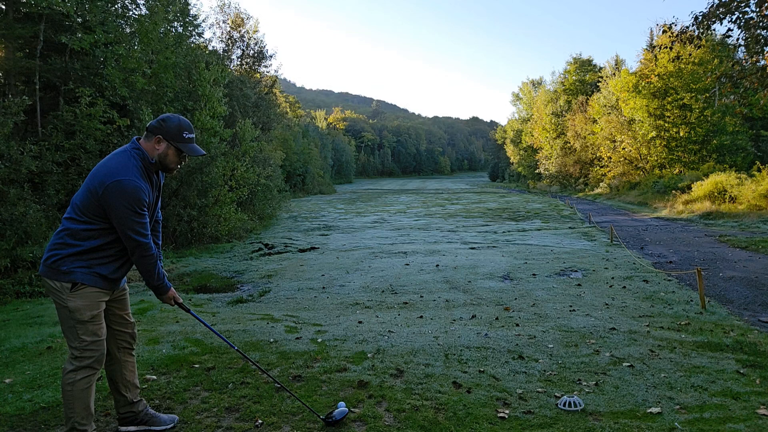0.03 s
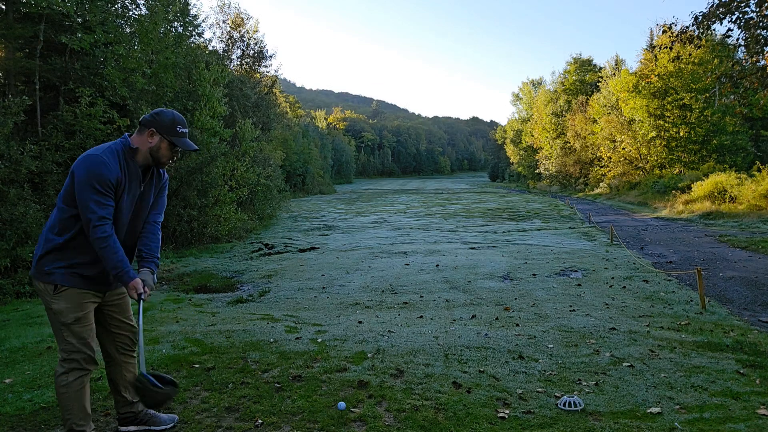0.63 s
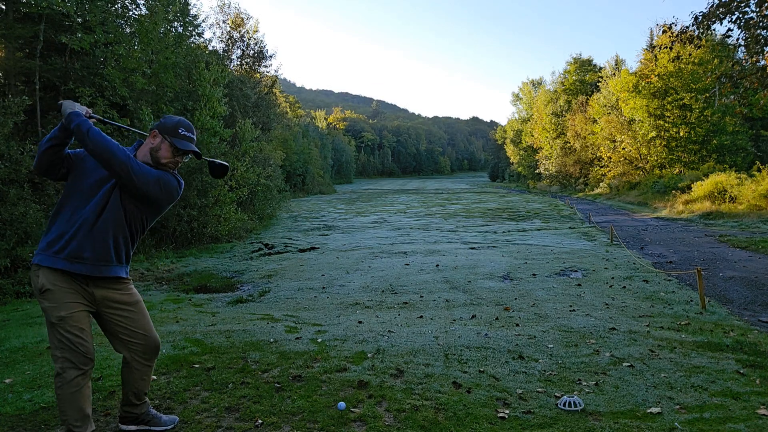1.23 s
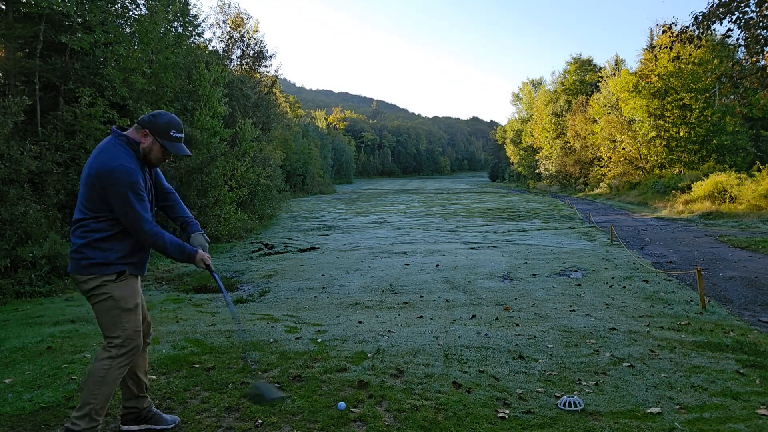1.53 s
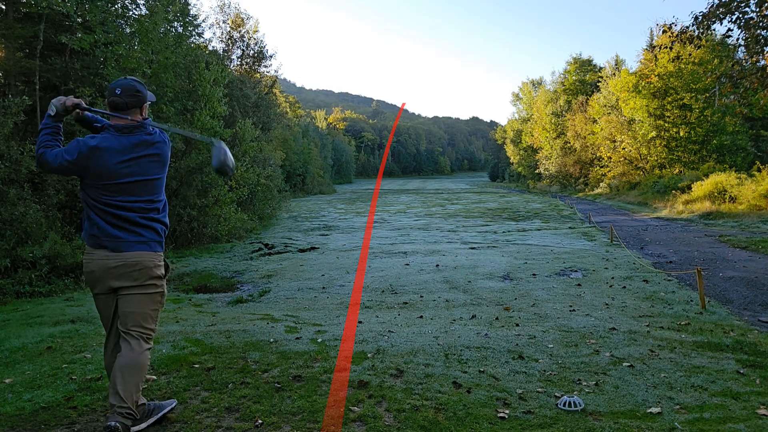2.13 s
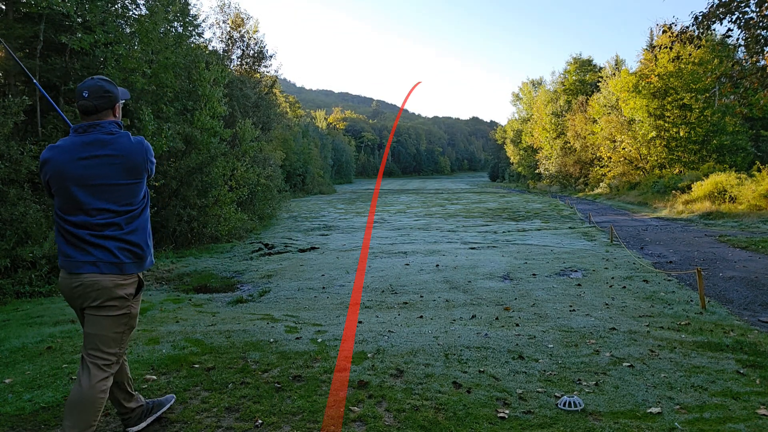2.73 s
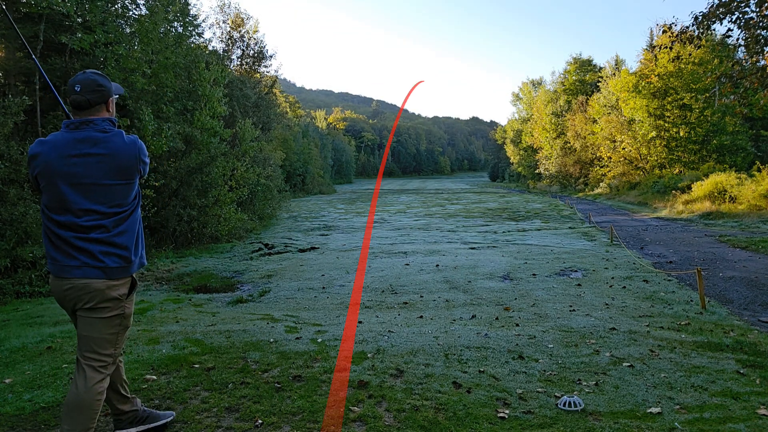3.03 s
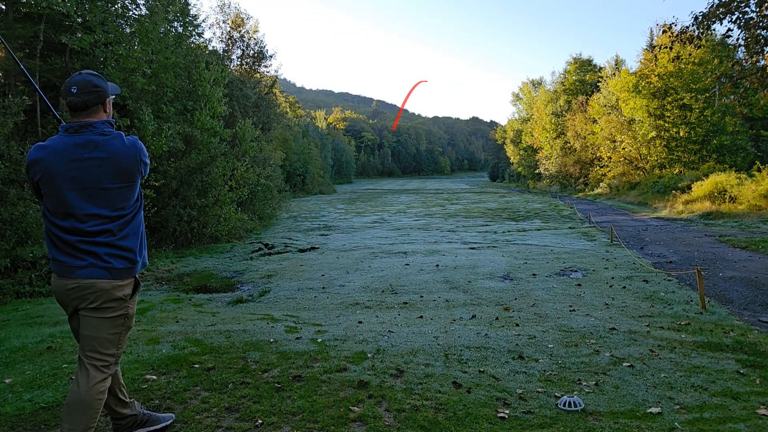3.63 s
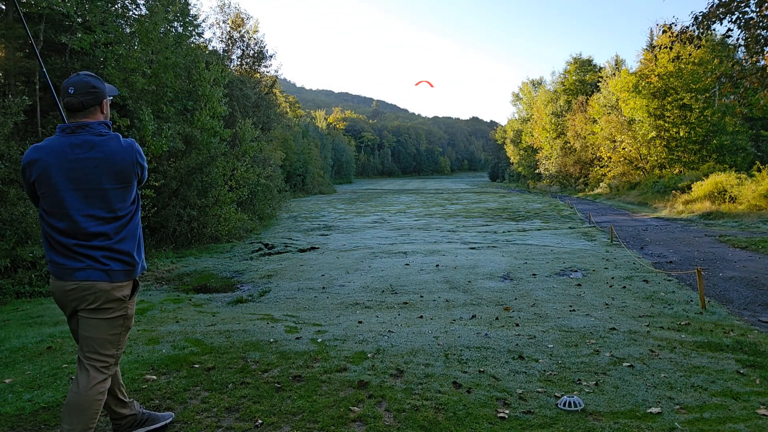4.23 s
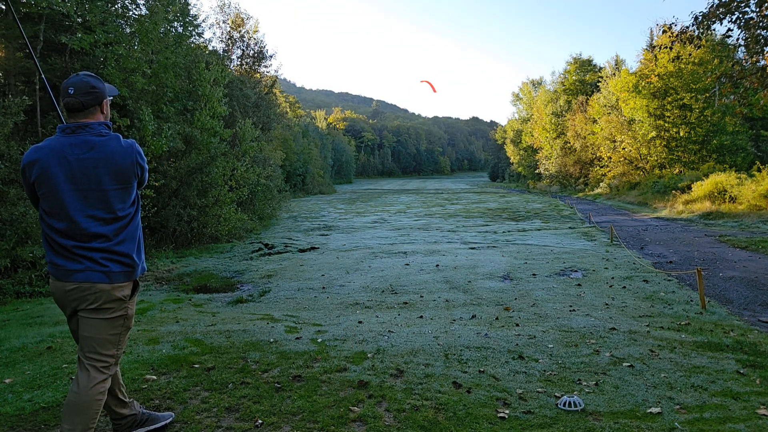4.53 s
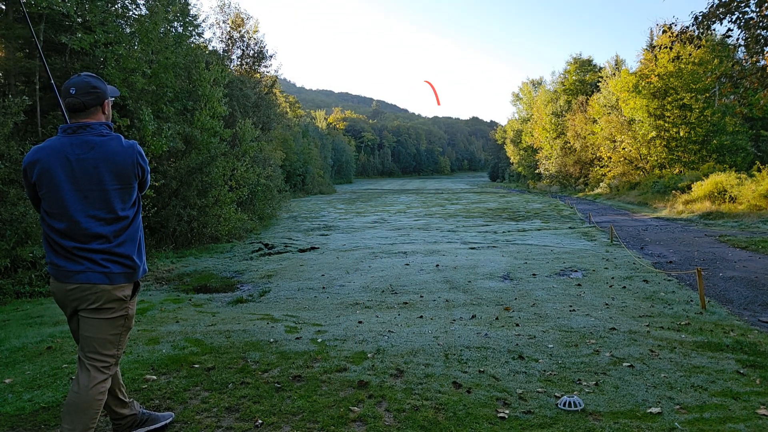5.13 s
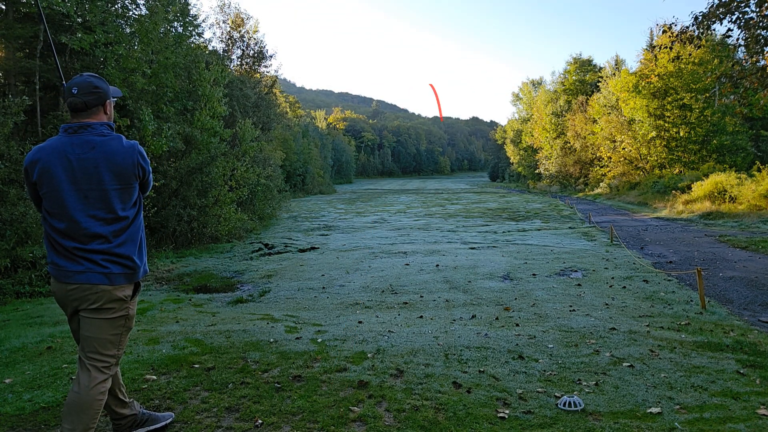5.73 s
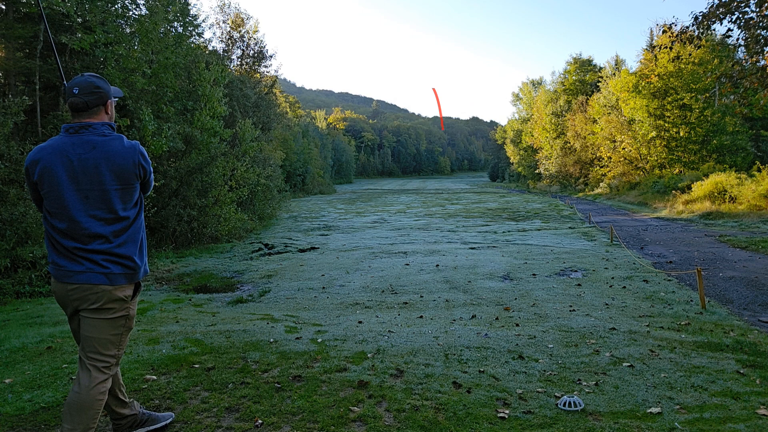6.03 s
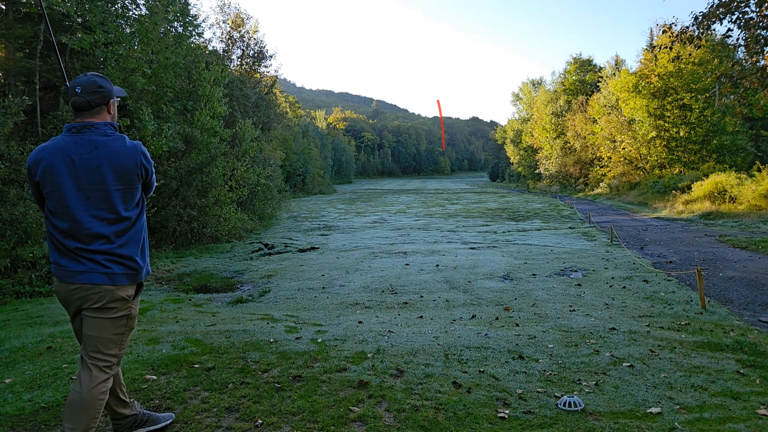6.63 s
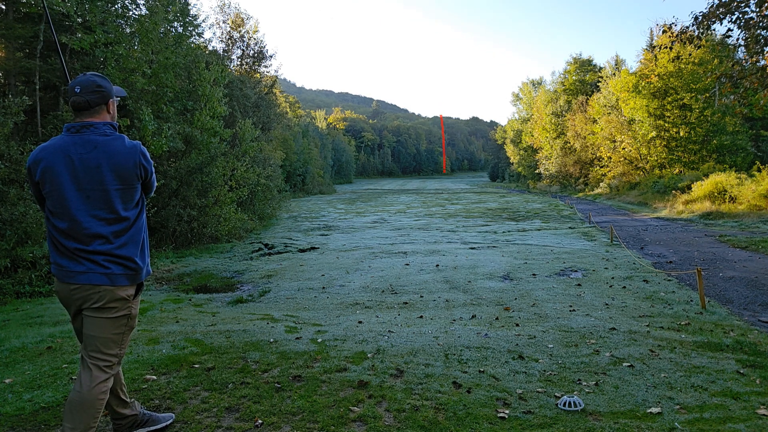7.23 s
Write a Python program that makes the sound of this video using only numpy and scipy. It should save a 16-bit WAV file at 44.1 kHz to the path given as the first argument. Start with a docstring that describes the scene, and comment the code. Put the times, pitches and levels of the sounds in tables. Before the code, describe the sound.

A quick swish and a sharp, ringing crack of a golf club hitting a ball, echoing off trees, with faint birds and low rumble.

```python
"""A golfer hits a driver off the tee in a wooded valley; stereo microphone behind the tee, still morning.
Close by, the shaft whistles as it sheds vortices, the ball cracks off the face, and the hollow metal head
rings as it flies on. Near trunks and the trees down the fairway throw it all back.
His jacket rustles, his shoes scuff and his front foot thuds. Small birds call from the trees;
far off, a larger bird calls and an engine drones under the quiet air."""
import sys
import numpy as np
from scipy import signal
from scipy.fft import rfft, irfft
from scipy.io import wavfile
from scipy.ndimage import uniform_filter1d

SR = 44100
rng = np.random.default_rng(int(sys.argv[2]) if len(sys.argv) > 2 else 0)


def wav_record(signal):
    """Record a signal, one row per channel, as 16-bit PCM in the file named by sys.argv[1]."""
    frames = np.transpose(np.atleast_2d(signal))
    bounded = np.clip(frames, -1, 1)
    # unit amplitude maps onto the largest positive 16-bit level
    quanta = np.round(bounded * 32767).astype(np.int16)
    wavfile.write(sys.argv[1], SR, quanta)


N = 321930
TIME, FREQS = np.arange(N) / SR, np.fft.rfftfreq(N, 1 / SR)
IMPACT_S, DOWNSWING_S = 1.632, 0.132
HEAD_MACH, ARC_RAD_PER_S = 0.105, 29  # the flying head's speed, and how fast its heading turns

# quiet valley air: f/Hz, level/dB per Hz
AIR_SPECTRUM = [(12, -42), (20, -15), (49, -6.5), (120, -3.5), (228, -16), (277, -20), (357, -23.5),
                (399, -25), (802, -24.5), (1120, -31.5), (1960, -39.5), (2460, -47.5), (4300, -50),
                (6010, -58.5), (16000, -67)]
# left-right likeness of that air at the microphone: f/Hz, correlation
AIR_LIKENESS = [(60, 0.9), (180, 0.85), (550, 0.45), (1650, -0.46), (4970, 0.3), (15000, -0.55)]
# the same for near sounds and echoes: f/Hz, correlation
NEAR_LIKENESS = [(100, 0.93), (350, .9), (700, -0.00012), (1400, -0.13), (3000, -0.16), (8000, -0.21)]
# orders of a far engine: f/Hz, level/dB, wander/Hz
ENGINE_ORDERS = [(57.2, -65, 2.1), (114.1, -62, 2.2), (169.4, -76, 2.9), (227.2, -75.5, 5.5),
                 (348.1, -86, 5.9)]
# what the woods return: f/Hz, level/dB, loss on the way/(dB/s)
FOLIAGE = [(150, 0.5, 13.5), (594.5, -1.5, -1.5), (1486.2, -3.5, -4), (2639.4, -2.5, 10), (4170, 5.5, 12.5),
           (6170, 7.5, 21), (6420, 1, 43), (8900, 0.5, 49.5), (9923, -1.5, 76.5), (15000, -0.5, 95)]
# clumps of echoes from round the tee and down the fairway: delay/s, spread/s, level/dB
TREE_CLUMPS = [(0.052, .029, -2), (.12, .04, -19), (.315, .065, -29.5)]
# sliding jacket cloth: f/Hz, level/dB per Hz
CLOTH_SPECTRUM = [(800, -9.5), (2000, -5), (3800, 2.5), (5700, -4), (7300, -5), (8700, -1), (9800, -15),
                  (16000, -19.5)]
# he moves in the backswing, the swing, the finish and as he settles: t/s, spread/s, level/dB
JACKET_MOVES = [(1.0, 0.16, -90), (1.72, 0.4, -75), (2.66, 0.21, -82), (3.25, 0.1565, -89)]
# shoes on grass and flicks of cloth, the last a grainy burst under the bird's chip: t/s, level/dB, fade/s,
# centre f/Hz
SCUFFS = [(0.21, -71.5, 0.042, 4550), (1.477, -57.5, 0.0064, 6812), (1.958, -70, 0.0161, 7520),
          (2.459, -68.5, 0.011, 7310), (2.964, -78.5, .02, 7510), (3.099, -66, 0.019, 6100),
          (3.259, -79, 0.027, 4056), (3.408, -88.5, 0.00924, 7600), (4.035, -80, 0.017, 3000),
          (4.428, -75.5, 0.014, 4981), (5.865, -74, 0.013, 3590), (6.093, -74, 0.011, 3900)]
# thin peeps: t/s, length/s, end f/Hz, sag/share of f, level/dB, L-R/dB,
# lower voice's end f/Hz, its relative level/dB
PEEPS = [(0.228, 0.066, 5320, 0.016, -75, .5, 5233, -12), (1.239, 0.053, 5380, 0.016, -73, 1.5, 5220, -9),
         (3.152, 0.0748, 5380, 0.0207, -77, .5, 5090, -2), (3.508, .1, 6970, .02, -88, -6, 6732, -4),
         (3.557, 0.042, 5210, .02, -89, -2, 4930, -3), (3.722, 0.0448, 7310, 0.032, -92.5, -8, 6627, -4),
         (4.049, 0.0505, 5410, 0.0098, -78.5, 0.5, 5130, -1),
         (4.476, 0.052, 5340, 0.011, -79.5, 2, 5020, -2), (5.041, 0.048, 5240, .01, -82.5, 4, 4760, 2),
         (5.815, 0.065, 5530, 0.0093, -78.5, -2, 5256, -0.5),
         (6.671, 0.0567, 5226, 0.011, -78.5, 2.5, 4766, 1),
         (6.799, 0.057, 6300, 0.019, -96, -3.5, 6104, -3)]
# calls that sweep up: t/s, length/s, top f/Hz, rise/share of f, level/dB
UPSLURS = [(1.39, 0.085, 8314, 0.065, -56.5), (1.535, 0.05, 8133, .17, -54.5),
           (2.985, 0.037, 3474, 0.017, -89), (3.027, 0.035, 3850, 0.022, -88.5),
           (4.431, 0.052, 7630, 0.17, -72.5), (5.838, .042, 7150, .07, -88),
           (5.937, .038, 7530, 0.031, -93), (5.979, 0.044, 3450, .03, -90)]
# partials of one raspy chip: f/Hz, level/dB
CHIP_PARTIALS = [(3680, -5.5), (4350, -3), (5680, -9)]
# a larger bird far off: t/s, length/s, top f/Hz, level/dB
FAR_CALLS = [(1.408, 0.21, 1233, -69), (2.443, 0.22, 1232, -70.5), (6.613, 0.11, 1374, -80),
             (6.999, 0.1, 1359, -81)]
# the head's hiss, with a low push of air: f/Hz, level/dB per Hz
HISS_SPECTRUM = [(40, -5), (110, 6.5), (200, 6), (370, 3.5), (700, 2), (1600, -2.5), (2600, -11),
                 (4200, -5), (6000, -8.5), (8000, -5.5), (11000, -15), (16000, -23.5)]
# stretches of the shaft, grip to tip: whistle f/Hz at full speed, level/dB
SHAFT_WHISTLES = [(760, -6.5), (1000, -3), (1200, -1), (1900, -14.5)]
# the whistle points at the microphone, going down and following through: t/s, spread/s, level/dB
SHAFT_PASSES = [(1.563, .008, -45), (1.593, .024, -36), (1.72, .04, -56)]
# modes of the face snapping back: f/Hz, t/s after impact, level/dB, L-R/dB
FACE_MODES = [(7600, .00058, -3.5, -2), (11040, .001, -14, 4)]
# the shell's burst of noise: f/Hz, level/dB per Hz
BURST_SPECTRUM = [(200, -16.5), (900, -10), (2500, -5.5), (4000, -2.5), (7500, -1.5), (9500, -3.5),
                  (12500, -6.5), (15000, -5.5), (16800, -13.5)]
# modes of the head at rest: f/Hz, level/dB, t60/s, t/s after impact when its beam passes, beam gain/dB
HEAD_MODES = [(3770, -25, .13, .021, 9), (4362, -39, 0.097, .016, 3), (5070, -41, 0.11, .012, 0.5),
              (5830, -18, 0.15, 0.042, 12.5), (6082, -31, 0.093, .03, 6), (7930, -25.5, 0.12, 0.029, 10),
              (8690, -34, 0.14, .012, 2), (9176, -28, 0.15, .036, 4), (11020, -38, .09, .028, 2.5),
              (12400, -41, 0.09, .028, 3.5), (14810, -40, .09, .028, 2.5)]
# the ring's paths, straight and off the turf: angle from the heading at impact/rad, delay/s, level/dB
RING_PATHS = [(2.35, 0.0011, 3.5), (1.3, 0.0015, -5.5)]
# near trunks that return the ring: angle from the heading at impact/rad, delay/s, level/dB, L-R/dB
TRUNKS = [(2.2, .026, -3, -0.5), (1.1, 0.036, -7, 0), (-1.6, .05, -5.5, -4.5), (0.86, .057, -8.5, -0.5),
          (-1.6, .07, -14.5, -3.5), (-1.9, .1, -23, -1), (1.4, .14, -27, -1)]
# stands of trees down the fairway that slap the crack back: delay/s, level/dB, centre f/Hz
FAIRWAY_SLAPS = [(.085, -26, 1144), (0.151, -34.5, 1294), (.265, -34, 1143), (.31, -32.5, 990),
                 (.41, -34, 1855), (0.491, -41, 1319), (0.549, -39.5, 1603), (.74, -48.5, 1800),
                 (0.951, -51, 1610), (1.121, -53, 1306), (1.451, -50, 1297)]


def amp(db):
    """Decibels to gain."""
    return 10 ** (np.asarray(db) / 20)


def unit(x):
    """Scales to rms 1."""
    return x / np.sqrt(np.mean(x ** 2) + 1e-20)


def pan(left_db):
    """Gains of the two channels for a left-right difference."""
    return amp([[left_db / 2], [-left_db / 2]])


def swell(t, centre_s, spread_s):
    """A smooth rise and fall of height 1."""
    return np.exp(-((t - centre_s) / spread_s) ** 2)


def wander(samples, length=N):
    """A random curve of rms 1, smoothed over so many samples."""
    return unit(uniform_filter1d(rng.standard_normal(length), size=samples))


def read(points, hz, column=1):
    """One column of a table over log frequency."""
    table = np.transpose(points)
    return np.interp(np.log(hz + 1), np.log(table[0] + 1), table[column])


def add(mix, s, sound):
    """Mixes a sound in at time s."""
    part = mix[..., round(s * SR):][..., :sound.shape[-1]]
    part += sound[..., :part.shape[-1]]


def stereo(a, b, same):
    """Two channels with correlation same, from two independent noises."""
    return np.array([a, same * a + np.sqrt(1 - same ** 2) * b])


def noise(gain, likeness=NEAR_LIKENESS):
    """Stereo noise with a given spectrum and left-right likeness."""
    a, b = rfft(rng.standard_normal((2, N)))
    return unit(irfft(stereo(a, b, read(likeness, FREQS)) * gain, N))


def resonate(x, hz, width_hz):
    """Two passes through a resonance that follows hz, scaled to rms 1."""
    turn = np.exp(2j * np.pi * np.cumsum(hz * np.ones(x.shape[-1])) / SR)
    pole = np.exp(-np.pi * width_hz / SR)
    for _ in range(2):
        x = 2 * (turn * signal.lfilter([1 - pole], [1, -pole], x / turn)).real
    return unit(x)


def clearing(t, edge_s=0.036, loss_db_per_s=5.5):
    """Echo strength against delay on the tee: clumps of trees, and deep woods that soak the sound up."""
    depth = t / edge_s
    deep = amp(-3 - loss_db_per_s * t) * np.minimum(depth, 1) / np.maximum(depth, 1) ** 1.5
    clumps = sum(amp(db) * swell(t, delay, spread) for delay, spread, db in TREE_CLUMPS)
    return np.hypot(deep, clumps)


def thicket(t, t60_s=0.43):
    """Echo strength against delay for a perch deep in the trees."""
    return amp(-60 * t / t60_s)


def woods(x, place=clearing, lumpy_db=2.5):
    """Countless small echoes from trunks and leaves, in clumps; long paths lose their treble."""
    t = np.arange(SR + SR // 2) / SR
    lumps = amp(lumpy_db * wander(250, len(t)))
    taps = rng.standard_normal((2, len(t))) * place(t) * lumps
    hz, delay, (a, b) = signal.stft(taps / np.linalg.norm(taps[0]), SR, nperseg=256)
    hz = hz[:, None]
    echoes = stereo(a, b, read(NEAR_LIKENESS, hz))
    echoes *= amp(read(FOLIAGE, hz) - read(FOLIAGE, hz, column=2) * delay)
    response = signal.istft(echoes, SR, nperseg=256)[1]
    return signal.fftconvolve(np.atleast_2d(x), response, axes=1)[:, :N]


def valley_air(air_db=-62, rush_db=-80, rush_hz=1150, rush_octaves=0.5, hold_s=3, fade_db_per_s=5.5):
    """Low rumble and faint air all round; a far-off rush holds, then dies away."""
    air = amp(air_db) * noise(amp(read(AIR_SPECTRUM, FREQS)), AIR_LIKENESS)
    rush_band = np.exp(-(np.log2((FREQS + 1) / rush_hz) / rush_octaves) ** 2 / 2)
    rush_level = amp(rush_db - fade_db_per_s * np.maximum(TIME - hold_s, 0))
    return air + rush_level * noise(rush_band, AIR_LIKENESS)


def far_engine():
    """A distant engine, dead centre: a few low orders, each wavering in pitch."""
    out = np.zeros(N)
    for hz, db, wander_hz in ENGINE_ORDERS:
        pitch = hz + wander_hz * wander(5000)
        out += amp(db) * unit(np.sin(2 * np.pi * np.cumsum(pitch) / SR))
    return out


def jacket_and_shoes(grain_db=2, scuff_width_hz=3600, wet_db=-9):
    """Near the microphone, cloth slides as he turns; shoes and sleeves give short grainy scuffs."""
    grain = unit(amp(grain_db * wander(700)))
    cloth = noise(amp(read(CLOTH_SPECTRUM, FREQS)))
    out = cloth * sum(amp(db) * swell(TIME, s, spread) for s, spread, db in JACKET_MOVES)
    t = np.arange(SR // 3) / SR
    for s, db, fade, hz in SCUFFS:
        rub = resonate(cloth[:, round(s * SR):][:, :len(t)], hz, scuff_width_hz)
        add(out, s, amp(db) * rub * (1 - np.exp(-t / 0.0083)) * np.exp(-t / fade))
    return out * grain + amp(wet_db) * woods(out)


def chirp(length, end_hz, slide, buzz, trills_per_s=80, flutter_db=3.5):
    """A thin whistle that starts off pitch by the share slide and settles; buzz scales its rough trill."""
    t = np.arange(0, length, 1 / SR)
    progress = t / length
    curves = uniform_filter1d(rng.standard_normal((2, SR // 4)), size=160)
    jitter, flutter = (unit(x)[:len(t)] for x in uniform_filter1d(curves, size=120))
    trill = 240 * np.sin(2 * np.pi * (trills_per_s * t + rng.random())) + 70 * jitter
    hz = end_hz * (1 + slide * (1 - progress) ** 3) + buzz * trill
    envelope = unit(amp(flutter_db * flutter)) * np.sqrt(2 * abs(np.sin(np.pi * progress)))
    return envelope * np.sin(2 * np.pi * np.cumsum(hz) / SR)


def small_birds(lower_lag_s=0.008, chip_s=6.09, direct_db=-5, wet_db=-1.5):
    """Small birds peep with two voices at once, call upward and chip, half lost in the trees."""
    out = np.zeros((2, N))
    for s, length, hz, sag, db, pan_db, lower_hz, lower_db in PEEPS:
        gain = amp(db) * pan(pan_db)
        add(out, s, gain * chirp(length, hz, sag, buzz=0.38))
        add(out, s + lower_lag_s, gain * amp(lower_db) * chirp(length, lower_hz, slide=0.07, buzz=0.38))
    for s, length, hz, rise, db in UPSLURS:
        add(out, s, amp(db) * chirp(length, hz, -rise, buzz=0.25))
    for hz, db in CHIP_PARTIALS:
        add(out, chip_s, amp(db - 76.5) * chirp(0.016, hz, slide=0, buzz=1.3))
    return amp(direct_db) * out + amp(wet_db) * woods(out, thicket)


def far_bird(width_hz=150, wet_db=-5):
    """Hoarse calls, each blurred by distance into one soft note that sinks as it fades."""
    out = np.zeros((2, N))
    for s, length, hz, db in FAR_CALLS:
        progress = np.arange(0, length, 1 / SR) / length
        arch = np.sin(np.pi * progress ** 0.6)
        rasp = rng.standard_normal((2, SR))[:, :len(arch)]
        add(out, s, amp(db) * arch * resonate(rasp, hz * (0.9 + 0.1 * arch), width_hz))
    return out + amp(wet_db) * woods(out, thicket)


def club_speed(t, halving_s=0.029):
    """Share of full speed: a steady rise to the ball, then a quick slowing."""
    late = t - IMPACT_S
    return np.clip(1 + late / DOWNSWING_S, 0, 1) / (1 + np.maximum(late, 0) / halving_s)


def swish(glide_power=0.88, hiss_db=-32, hiss_power=3.1, hum_hz=632, hum_db=-24, wet_db=-20):
    """Vortices off the shaft whistle higher with speed; the head hisses, and hums just before the ball."""
    start = IMPACT_S - DOWNSWING_S
    t = start + np.arange(SR // 2) / SR
    speed = club_speed(t)
    air = noise(1, likeness=[(100, 0.95), (16000, 0.7)])

    def whistle(hz, width_hz=120):
        """Eddies that gather round one pitch."""
        eddies = air[:, rng.integers(N // 2):][:, :len(t)]
        return resonate(eddies, hz, width_hz)

    hiss = amp(hiss_db) * speed ** hiss_power * noise(amp(read(HISS_SPECTRUM, FREQS)))[:, :len(t)]
    facing = sum(amp(db) * swell(t, s, spread) for s, spread, db in SHAFT_PASSES)
    shaft = facing * sum(amp(db) * whistle(hz * speed ** glide_power) for hz, db in SHAFT_WHISTLES)
    hum = amp(hum_db) * swell(t, IMPACT_S - 0.006, 0.0045) * whistle(hum_hz, width_hz=150)
    out = np.zeros((2, N))
    add(out, start, hiss + shaft + hum)
    return out + amp(wet_db) * woods(out)


def ball_crack(t, push_db=-3, push_s=0.00014, knock_db=-14, knock_s=0.00028, low_cut_hz=240):
    """The ball flattens and springs off: a pressure swing, a slower knock of the head, a snap of the face."""
    def swing(width_s):
        """A push of air and the pull that follows."""
        u = (t - 0.00036) / width_s
        return -u * np.exp(-u ** 2 / 2)

    push = amp(push_db) * swing(push_s) + amp(knock_db) * swing(knock_s)
    push = signal.lfilter(*signal.butter(2, low_cut_hz, "high", fs=SR), push)  # little bass in the crack
    snap = sum(amp(db) * pan(pan_db) * swell(t, s, 0.0003) * np.sin(2 * np.pi * hz * t)
               for hz, s, db, pan_db in FACE_MODES)
    return pan(0.94) * push + snap


def shell_burst(t, level_db=-14, fade_s=0.0038, turf_db=-24):
    """The shell's densest modes merge into a burst of noise; the turf scatters a little of it."""
    dense_modes = noise(amp(read(BURST_SPECTRUM, FREQS)))[:, :len(t)]
    attack = 1 - np.exp(-t / 0.000079)
    decay = np.exp(-t / fade_s) + amp(turf_db) * np.exp(-t / 0.025)
    return amp(level_db) * pan(1) * dense_modes * attack * decay


def strike(contact_s=0.0005, right_lead_s=0.000048, ball_wet_db=-17, burst_wet_db=-3):
    """The crack, then the shell's burst as the ball leaves, close up and back from the trees."""
    t, out = np.arange(SR // 3) / SR, np.zeros((2, N))
    ball = ball_crack(t + np.array([[0], [right_lead_s]]))
    burst = shell_burst(t)
    add(out, IMPACT_S, ball)
    add(out, IMPACT_S + contact_s, burst)
    add(out, IMPACT_S, woods(amp(ball_wet_db) * ball + amp(burst_wet_db) * burst))
    add(out, IMPACT_S, fairway_slaps(ball))
    return out


def doppler(t, angle):
    """The head's own time as heard from one direction, while its heading turns along the swing."""
    return np.cumsum(1 / (1 - HEAD_MACH * np.cos(angle + ARC_RAD_PER_S * t))) / SR


def head_ring(t, direct):
    """The head's modes: direct, their beams sweep past and the upper ones waver; scattered, all blur."""
    knots, out = np.arange(0, 1, 1 / 350), 0
    for hz, db, t60, beam_s, beam_db in HEAD_MODES:
        lift_db = beam_db * swell(t, beam_s, 0.005) if direct else 0
        waver = 0.08 * (hz / 7000) ** 3 if direct else 0.05
        drift = waver * np.interp(t, knots, np.cumsum(rng.standard_normal(len(knots))))
        out = out + amp(db - 60 * t / t60 + lift_db) * np.sin(2 * np.pi * (hz * t + drift + rng.random()))
    return out * (1 - np.exp(-t / 0.0022))


def flying_head(facing_s=0.029, turn_s=0.0071, turned_db=-9.5, recede_db_per_s=150,
                ahead_db=2, wet_db=-16, directions=11):
    """The ringing head faces the microphone, turns away and recedes; trunks and woods return its ring."""
    t, out = np.arange(SR // 3) / SR, np.zeros((2, N))
    right_lead_s = np.array([[0], [0.00007]])
    away_s = np.maximum(t - facing_s, 0)
    shadow_db = turned_db * np.minimum(away_s / turn_s, 1) - recede_db_per_s * away_s
    for angle, delay, db in RING_PATHS:
        ring = head_ring(doppler(t, angle) + right_lead_s, direct=True)
        add(out, IMPACT_S + delay, amp(db + shadow_db) * ring)
    for angle, delay, db, pan_db in TRUNKS:
        ring = head_ring(doppler(t, angle) + right_lead_s * np.sin(angle), direct=False)
        add(out, IMPACT_S + delay, amp(db - recede_db_per_s * t) * pan(pan_db) * ring)
    # each side of the woods hears its own Doppler glide, so each mode returns as a band
    for angle in 2 * np.pi * np.arange(directions) / directions:
        louder_ahead = amp(ahead_db * np.cos(angle + ARC_RAD_PER_S * t))
        ring = louder_ahead * head_ring(doppler(t, angle), direct=False)
        add(out, IMPACT_S, amp(wet_db) * pan(-3.6) * woods(ring))
    return out


def fairway_slaps(x, smear_s=0.056, band_ratio=1.86):
    """Distant slaps, each smeared by the depth of the trees and left with only its middle range."""
    t, taps = np.arange(SR // 3) / SR, np.zeros((2, 2 * SR))
    for delay, db, hz in FAIRWAY_SLAPS:
        slap = rng.standard_normal((2, len(t))) * (1 - np.exp(-t / 0.0092)) * np.exp(-t / smear_s)
        band = signal.butter(2, [hz / band_ratio, hz * band_ratio], "band", fs=SR, output="sos")
        add(taps, delay, amp(db) * signal.sosfilt(band, slap) / np.linalg.norm(slap[0]))
    return signal.fftconvolve(x, taps, axes=1)


def footfall(at_s=1.748, level_db=-51, hz=353, width_hz=260, spread_s=0.007):
    """A dull push of the shoe into the turf as his weight lands on the front foot."""
    t, out = np.arange(SR // 10) / SR, np.zeros((2, N))
    thud = resonate(rng.standard_normal(len(t)), hz, width_hz)
    add(out, at_s - t.mean(), amp(level_db) * thud * swell(t, t.mean(), spread_s))
    return out


def scene():
    """Everything that reaches the microphone behind the tee."""
    background = valley_air() + far_engine() + jacket_and_shoes() + small_birds() + far_bird()
    return background + swish() + strike() + flying_head() + footfall()


def record(dry, opens_s=0.072, ceiling=0.9, edge_hz=16800):
    """The recorder opens after a moment, clips near full scale and limits the band."""
    opened = np.clip((TIME - opens_s) / 0.008, 0, 1)
    clipped = np.clip(dry * opened, -ceiling, ceiling)
    low_pass = signal.firwin(255, edge_hz, window=("kaiser", 9), fs=SR)
    return signal.oaconvolve(clipped, low_pass[None], "same")


dry = scene()
out = record(dry)
wav_record(out)
```